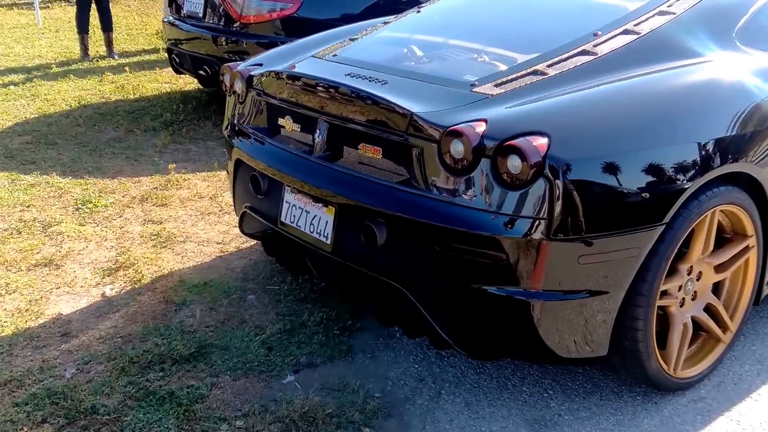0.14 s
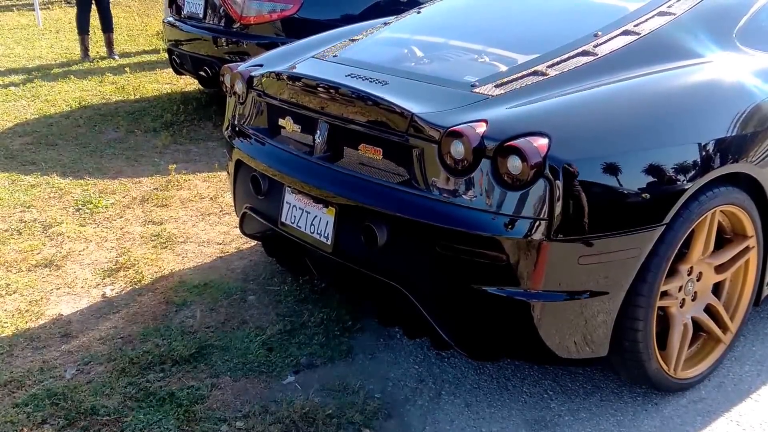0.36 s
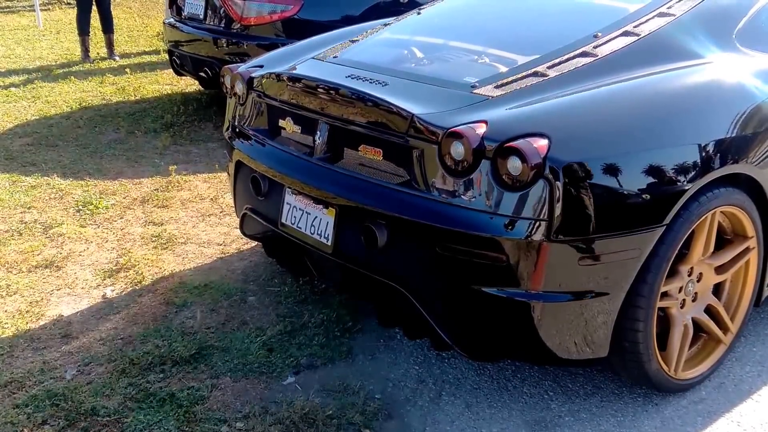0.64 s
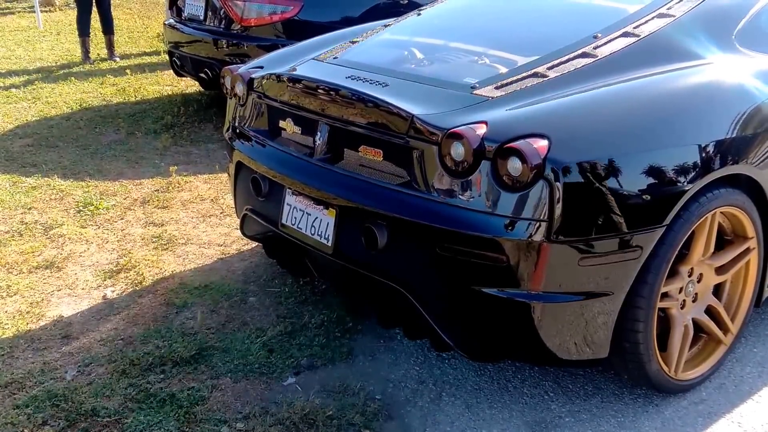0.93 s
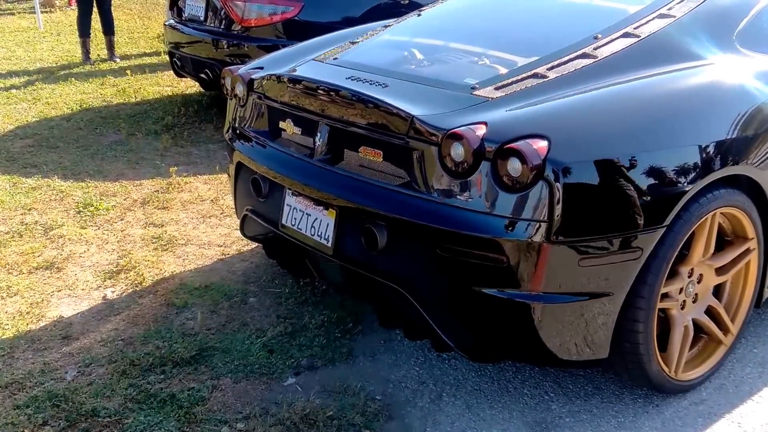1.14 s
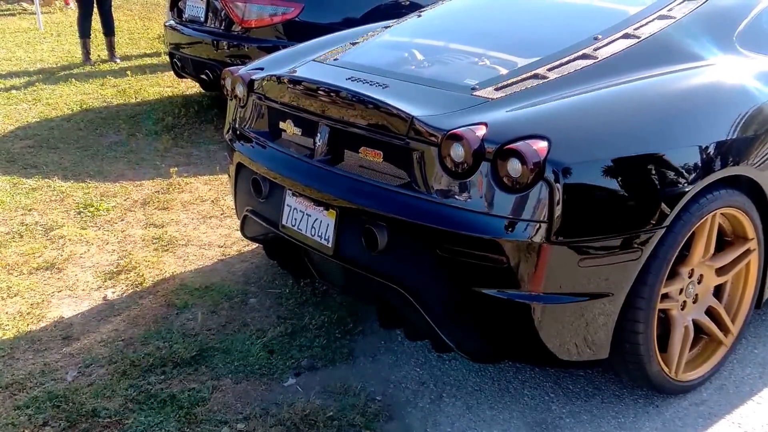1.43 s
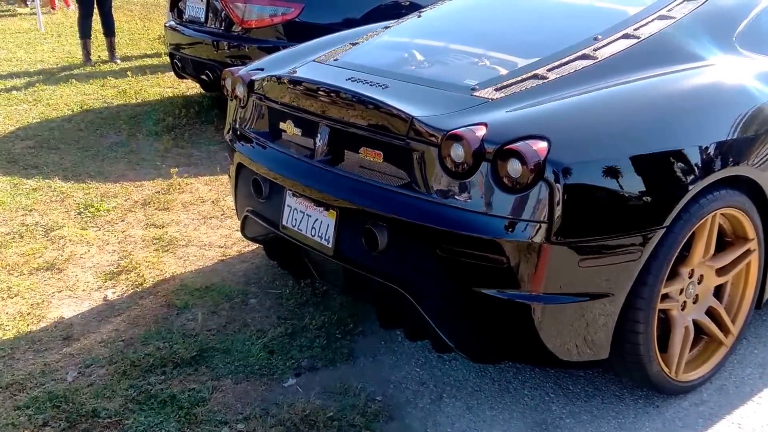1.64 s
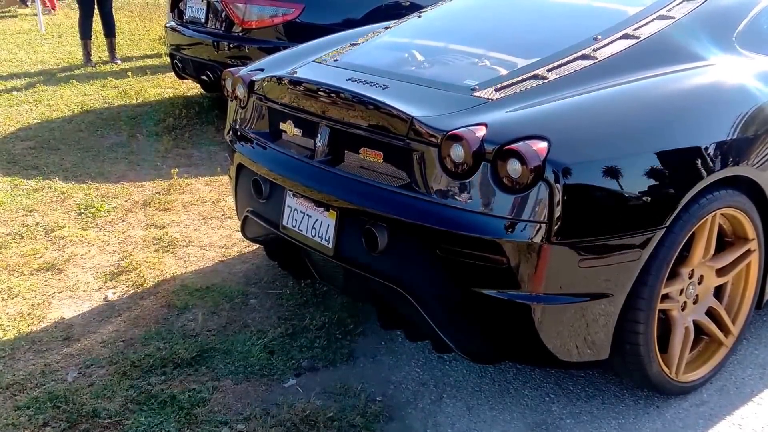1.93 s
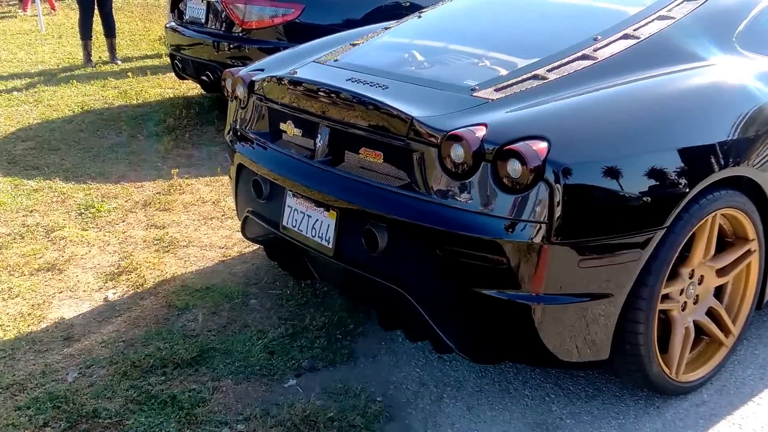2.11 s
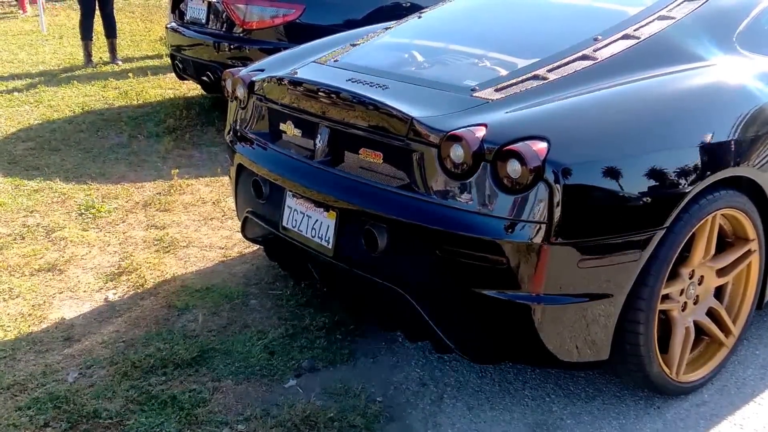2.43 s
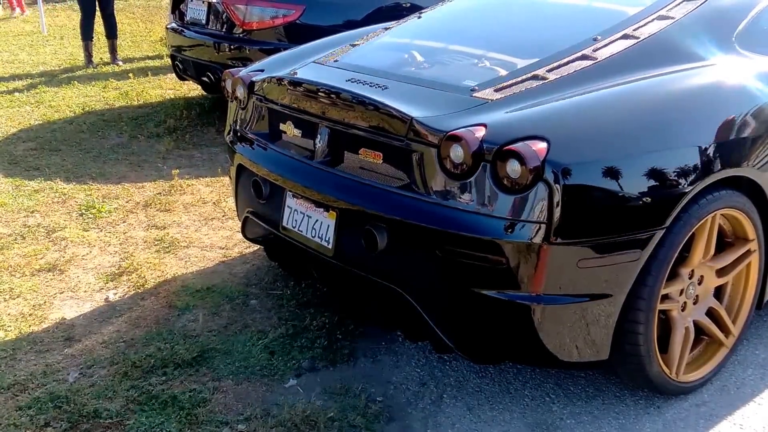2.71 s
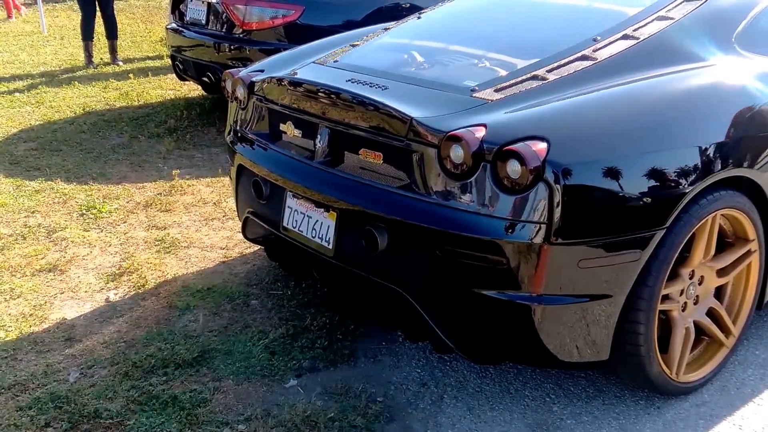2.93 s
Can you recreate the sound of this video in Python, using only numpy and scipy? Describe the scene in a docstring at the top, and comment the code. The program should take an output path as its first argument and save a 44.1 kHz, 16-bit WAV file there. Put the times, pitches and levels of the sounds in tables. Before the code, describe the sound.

Sports car exhaust crackles and pops as revs fall, dips lumpily, then settles to a droning idle.

```python
"""A V8 sports car comes off a hard rev: the throttle shuts and the exhaust note sinks into a lumpy dip,
then catches itself and settles on a booming fast idle. Engine orders and uneven firing pulses follow one
firing phase. Unburnt fuel crackles and pops in the exhaust as shaped noise while the revs fall;
thumps and gurgles are swelling sines, and gas noise adds rasp and hiss."""
import sys
import numpy as np
from scipy import signal
from scipy.fft import rfft, irfft, next_fast_len
from scipy.io import wavfile
from scipy.ndimage import uniform_filter1d, map_coordinates

SR = 44100
rng = np.random.default_rng(int(sys.argv[2]) if len(sys.argv) > 2 else 0)


def log_audio(samples):
    """Write samples as a 16-bit WAV file to the path given in sys.argv[1]."""
    # one column per channel
    frames = np.atleast_2d(samples).T
    # limit to full scale, then quantise
    limited = np.clip(frames, -1, 1)
    pcm = np.round(limited * 32767).astype(np.int16)
    wavfile.write(sys.argv[1], SR, pcm)


N = 134946

# How fast the cylinders fire as the revs fall, dip and recover: (time [s], firing rate [Hz])
SPEED = [(.06, 482.3), (.5, 308.9), (.85, 202.2), (1.1, 154.2), (1.23, 140.5), (1.42, 111.2), (1.52, 105.2),
         (1.71, 95.6), (2.1, 86.55), (2.29, 101.9), (2.56, 114.1), (3.06, 121.2)]
GRAIN_DB = 3  # depth of the random grain in the rasp, bark and pop noise


def amp(db):
    """Decibels to gain."""
    return 10 ** (np.asarray(db) / 20)


def unit(x):
    """Scale to rms 1."""
    return x / np.sqrt(np.mean(x ** 2) + 1e-20)


def along(points, hz):
    """Read (frequency [Hz], value) points on a log frequency axis."""
    f, v = np.transpose(points)
    return np.interp(np.log(hz + 1), np.log(f + 1), v)


def curve(rows):
    """Draw (time [s], value) points as one value per sample."""
    return np.interp(np.arange(N) / SR, *np.transpose(rows))


def wobble(rate):
    """A smooth random curve with rate knots a second."""
    knots = rng.standard_normal(N // 8)
    return map_coordinates(knots, [np.arange(N) * rate / SR], mode="wrap")


def filtered(x, response):
    """Multiply the spectrum of x by a response of frequency, padded against wrap-around."""
    m = next_fast_len(N + SR // 2)
    return irfft(rfft(x, m) * response(np.fft.rfftfreq(m, 1 / SR)), m)[..., :N]


def coloured(x, points):
    """Shape x with a minimum-phase filter of the drawn spectrum, at rms 1."""
    size = 16384
    log_gain = np.log(amp(along(points, np.fft.rfftfreq(size, 1 / SR))))
    # folding the cepstrum forward makes the filter causal, so attacks stay sharp
    cepstrum = irfft(log_gain)
    cepstrum[1:size // 2] *= 2
    cepstrum[size // 2 + 1:] = 0
    impulse = irfft(np.exp(rfft(cepstrum)))
    return unit(signal.fftconvolve(np.atleast_2d(x), impulse[None], axes=1)[:, :N])


def steady(x):
    """Even out the slow swells of x, over about 59 ms."""
    power = np.abs(uniform_filter1d(x ** 2, size=2600))
    return x / np.sqrt(power + 1e-4)


def swell(start, rise):
    """A rounded surge that peaks at 1, rise seconds after its start, and dies."""
    u = np.maximum(np.arange(N) / SR - start, 0) / rise
    return (u * np.exp(1 - u)) ** 2


def orders(phase, table, rough):
    """Engine orders locked to the firing phase; the higher ones waver more, the first not at all."""
    total = 0
    for k, db in table:
        waver = 1 + rough * np.log(k) * (wobble(35.17) + 1j * wobble(34.53))
        tone = np.exp(2j * np.pi * (k * phase + rng.random()))
        total = total + amp(db) * np.real(waver * tone)
    return np.sqrt(2) * total


def firings(phase, scatter):
    """The uneven part of the exhaust pulses: a repeating eight-cylinder pattern plus chance."""
    # each cylinder's departure from the average pulse, in firing order: strength [relative]
    cylinder_pattern = [-0.48, -0.55, -0.73, -0.79, 0.6, -0.16, 0.75, -1.05]
    at = np.flatnonzero(np.diff(np.floor(phase)) > 0)
    pulses = np.zeros(N)
    pulses[at] = np.resize(cylinder_pattern, len(at)) + scatter * rng.standard_normal(len(at))
    return unit(pulses)


def puffs(phase, grain_db):
    """Grainy gas noise that surges with each firing, only partly alike at the two ports."""
    alike = 0.54  # share of the noise power common to both ports
    gate_depth, grain_rate = 0.17, 600  # surge [fraction], grain [knots/s]
    noise = np.sqrt(alike) * rng.standard_normal(N) + np.sqrt(1 - alike) * rng.standard_normal((2, N))
    surge = 1 + gate_depth * np.cos(2 * np.pi * phase)
    return unit(noise * surge * amp(grain_db * wobble(grain_rate)))


def crackle():
    """Irregular tiny detonations of uneven size, timed alike at both ports, at rms 1."""
    rate, spread_db = 1100, 7  # sparks a second on average, size either way [dB]
    sparks = (rng.random(N) < rate / SR) * rng.choice([-1, 1], (2, N))
    return unit(sparks * amp(spread_db * rng.uniform(-1, 1, (2, N))))


def ringing(x):
    """Pipes and bodywork add a short metallic ring of decaying noise, different at each port."""
    ring_db, t60_s = -8, 0.065  # ring level well above 300 Hz, time to fall 60 dB
    t = np.arange(SR // 8) / SR
    tail = rng.standard_normal((2, len(t))) * amp(-60 * t / t60_s)
    wet = signal.fftconvolve(x, tail / np.linalg.norm(tail[0]), axes=1)[:, :N]

    def share(hz):
        return amp(ring_db) * hz / (hz + 300)

    # the last filter takes back the energy that the ring adds
    return filtered(x + filtered(wet, share), lambda hz: 1 / np.sqrt(1 + share(hz) ** 2))


def engine_bay_hiss(phase):
    """Hiss from the engine bay: gated gas noise with a little crackle."""
    # loudness of the hiss: (time [s], level [dB])
    hiss_level = [(1.35, -39), (1.5, -32.5), (2.11, -30.5), (2.17, -37), (2.4, -31), (2.55, -38),
                  (3.06, -42)]
    # spectrum of the hiss: (frequency [Hz], level [dB])
    hiss_colour = [(300, 4.5), (1600, -3), (2500, 2), (4000, -7.5), (7300, -14.5), (8500, -6.5),
                   (15500, -31)]
    source = 0.75 * crackle() + puffs(phase, grain_db=2.0)
    return amp(curve(hiss_level)) * coloured(source, hiss_colour)


def gas_rasp(phase):
    """Gas rasp: noise and crackle, with firing pulses that weaken as the square of the revs."""
    # loudness of the rasp: (time [s], level [dB])
    rasp_level = [(.04, -21), (.39, -23), (.58, -21), (.65, -27), (.72, -17), (.81, -33.5), (.915, -22.5),
                  (.96, -28.5), (1.35, -42.5)]
    # spectrum of the rasp: (frequency [Hz], level [dB])
    rasp_colour = [(300, -63), (1000, 9.5), (1700, -3), (2050, 6.5), (2300, -3.5), (3000, 1), (5000, -10.5),
                   (16000, -37)]
    revs = np.minimum(curve(SPEED) / SPEED[0][1], 1)
    buzz = steady(firings(phase, scatter=0.2)) * revs ** 2
    source = buzz + 2.25 * crackle() + puffs(phase, GRAIN_DB)
    return amp(curve(rasp_level)) * coloured(source, rasp_colour)


def overrun_thumps():
    """Late burns ring the silencer: each thump is a low sine under a rounded surge."""
    # low thumps in the silencer: (start [s], surge peak [dB])
    thump_events = [(0.084, -10), (0.466, -8.5), (0.576, -10.5), (.668, -12), (.972, -13), (1.02, -3.5),
                    (1.069, -2), (1.117, -8.5), (1.81, -13)]
    pitch_hz, rise_s = 137.9, 0.017
    t = np.arange(N) / SR
    return sum(amp(db) * swell(start, rise_s) * np.sin(2 * np.pi * pitch_hz * (t - start))
               for start, db in thump_events)


def overrun_gurgles():
    """Late burns ring the pipes: hollow sines at set pitches, fluttering in phase and size."""
    # hollow gurgles: (start [s], surge peak before the size flutter [dB], pitch [Hz])
    gurgle_events = [(0.041, -14.5, 700), (.213, -17, 660), (.41, -16.5, 700), (.545, -13.5, 635),
                     (0.677, -13, 510), (0.701, -13, 730), (.825, -16, 500), (0.893, -10, 605),
                     (1.027, -15.5, 530), (1.108, -13, 620)]
    rise_s, flutter_rate = 0.02, 130  # surge rise, flutter [knots/s]
    t = np.arange(N) / SR
    flutter = wobble(flutter_rate)  # radians
    size = amp(1.4 * wobble(flutter_rate))
    gurgles = sum(amp(db) * swell(start, rise_s) * np.sin(2 * np.pi * hz * t + flutter)
                  for start, db, hz in gurgle_events)
    return size * gurgles


def afterfire(phase):
    """Fuel ignites in the pipes: each pop starts sharply, crackles for a moment and dies."""
    # afterfire pops: (start [s], level [dB], length before the decay [s])
    pop_events = [(0, -5.5, 0.049), (0.058, -14.5, 0.056), (0.117, -10, 0.073), (0.206, -9.5, 0.015),
                  (0.24, -13, 0.017), (0.272, -8.5, 0.0095), (0.309, -13, 0.013), (0.344, -13, 0.051),
                  (0.412, -20, 0.009), (0.49, -21, 0.0025), (0.612, -17.5, 0.0069), (0.673, -27, 0.0047),
                  (0.745, -25.5, 0.0032), (0.769, -15, 0.0031), (0.914, -30, 0.0017), (1.092, -29, 0.003),
                  (1.118, -31, 0.0099), (1.202, -34, 0.045)]
    # spectrum of the pops: (frequency [Hz], level [dB])
    pop_colour = [(200, -25.5), (700, -1), (3200, 0.5), (6000, -7.5), (9000, -6), (16000, -26)]
    attack_s, decay_s = 0.00025, 0.0095
    t = np.arange(N) / SR
    power = np.zeros(N)
    for start, db, length in pop_events:
        attack = np.clip((t - start) / attack_s, 0, 1)
        decay = np.exp(-np.maximum(t - start - length, 0) / decay_s)
        power += (amp(db) * attack * decay) ** 2
    return np.sqrt(power) * coloured(2.25 * crackle() + puffs(phase, GRAIN_DB), pop_colour)


def scream(phase):
    """The full-throttle note: strong high orders that die quickly once the throttle shuts."""
    # full-throttle orders: (multiple of the firing rate, level [dB])
    scream_orders = [(1, 1), (2, -4), (3, -14), (4, 1.5), (5, -1), (6, 3), (7.5, -8)]
    level_db, shut_s, fall_db_per_s = -20, 0.041, 221
    after = np.maximum(np.arange(N) / SR - shut_s, 0)
    return amp(level_db - fall_db_per_s * after) * orders(phase, scream_orders, rough=0.1)


def burble(phase):
    """Uneven firings ring the pipes: a low boom and a hollow bark."""
    # loudness of the boom: (time [s], level [dB])
    boom_level = [(.06, -26.5), (.15, -21.5), (.9, -20), (1.1, -11.5), (1.3, -22), (1.65, -18),
                  (2.15, -19.5), (2.5, -24.5)]
    # loudness of the bark: (time [s], level [dB])
    bark_level = [(.02, -38), (.1, -16.5), (.58, -19), (.8, -19.5), (.92, -13.5), (1.28, -26.5),
                  (2.35, -28.5), (3.06, -31.5)]
    # spectrum of the boom: (frequency [Hz], level [dB])
    boom_colour = [(25, -23.5), (80, -15.5), (136, 4), (178, -12), (228, -7), (280, -20.5), (1000, -77)]
    # spectrum of the bark: (frequency [Hz], level [dB])
    bark_colour = [(200, -24), (400, -9), (620, -0.5), (850, -4.5), (990, -18), (1140, -4), (1320, -40),
                   (5000, -57)]
    boom = steady(coloured(firings(phase, scatter=0.68), boom_colour))
    bark_source = firings(phase, scatter=0.77) + 1.55 * puffs(phase, GRAIN_DB)
    bark = steady(coloured(bark_source, bark_colour))
    return amp(curve(boom_level)) * boom + amp(curve(bark_level)) * bark


def exhaust_note(phase):
    """Drone and pulling tone, uneven at low revs; overtones swell on crossing a pipe resonance."""
    # loudness of the drone before the stumble: (time [s], level [dB])
    drone_level = [(.8, -68), (1, -34), (1.195, -19), (1.212, -7.5), (1.45, -10), (1.77, -19), (2.2, -20),
                   (2.28, -11), (2.42, -7.5), (3.06, -8)]
    # loudness of the pulling tone, swelling as the idle governor feeds the engine: (time [s], level [dB])
    pull_level = [(1, -70), (1.42, -41), (1.48, -18), (1.65, -19.5), (1.8, -22.5), (2.14, -28.5),
                  (2.28, -17), (2.36, -19), (2.45, -32.5)]
    # orders of the drone at idle: (multiple of the firing rate, level [dB])
    idle_orders = [(1, 1.5), (2, -28), (3, -30.5), (5, -22.5), (6, -30.5), (7, -29)]
    # orders of the pulling engine: (multiple of the firing rate, level [dB])
    pull_orders = [(1.5, -12), (2, -4.5), (4, -15.5), (5, -18), (6, -12)]
    # tailpipe resonances: (centre [Hz], boost [dB])
    pipe_resonances = [(205, 5.5), (416, 13)]
    pipe_width_hz = 18.4
    # the strokes grow uneven in strength as the firing rate sinks to stumble_hz
    stumble_hz, steepness, depth_db, stumble_rate = 92, 10, 1.6, 45  # rate in knots/s
    stumble_db = depth_db * np.minimum(stumble_hz / curve(SPEED), 1) ** steepness
    drone_gain = amp(curve(drone_level) + stumble_db * wobble(stumble_rate))
    pull_gain = amp(curve(pull_level) + stumble_db * wobble(stumble_rate))
    drone = drone_gain * orders(phase, idle_orders, rough=0.1)
    pull = pull_gain * orders(phase, pull_orders, rough=0.35)

    def pipe(hz):
        return amp(sum(db * np.exp(-((hz - centre) / pipe_width_hz) ** 2)
                       for centre, db in pipe_resonances))

    return filtered(drone + pull, pipe)


def scene():
    """One firing phase links the engine layers; sound reaches the left port first and brighter."""
    # tilt between the ports: (frequency [Hz], left minus right [dB])
    port_tilt = [(100, -1.5), (1150, 0.5), (1950, 2.5), (2500, 8), (8000, 20.5)]
    lead_s, scream_pan_db = 0.00025, -15.5  # left lead; scream left minus right, before the tilt
    jitter = 1 + 0.002986 * wobble(25.28)
    phase = np.cumsum(curve(SPEED) * jitter) / SR  # counted in firings
    side = np.array([[0.5], [-0.5]])  # left, right
    overrun = overrun_thumps() + overrun_gurgles()
    rough_layers = engine_bay_hiss(phase) + gas_rasp(phase) + overrun + afterfire(phase) + burble(phase)
    panned_scream = scream(phase) * amp(side * scream_pan_db)
    car = ringing(rough_layers) + panned_scream + exhaust_note(phase)

    def ports(hz):
        gain = amp(side * along(port_tilt, hz))
        lead = np.exp(2j * np.pi * hz * side * lead_s)
        return gain / gain.mean(0) * lead

    return filtered(car, ports)


def record(dry):
    """Round off the highest peaks, then cut everything above the band limit."""
    ceiling, top_hz = 0.91, 15650  # soft limit before the cut [full scale], band limit [Hz]
    held = dry / (1 + np.abs(dry / ceiling) ** 8) ** (1 / 8)
    return filtered(held, lambda hz: hz < top_hz)


dry = scene()
out = record(dry)
log_audio(out)
```